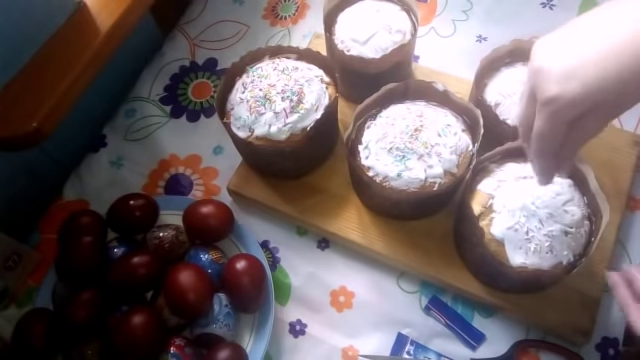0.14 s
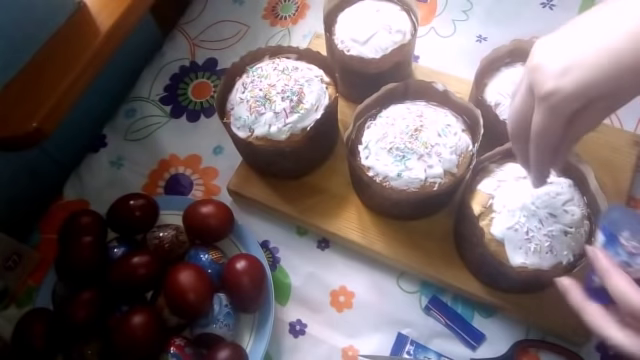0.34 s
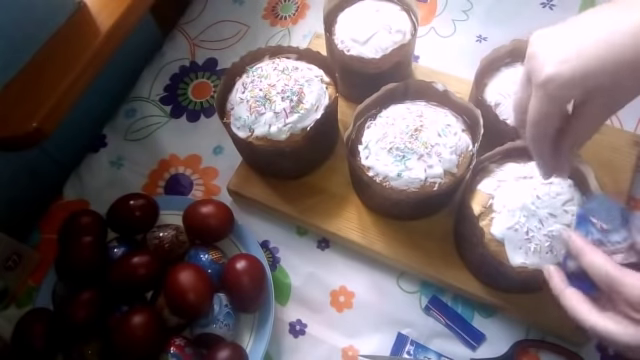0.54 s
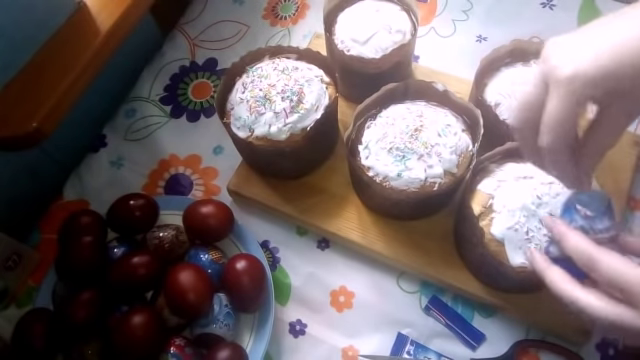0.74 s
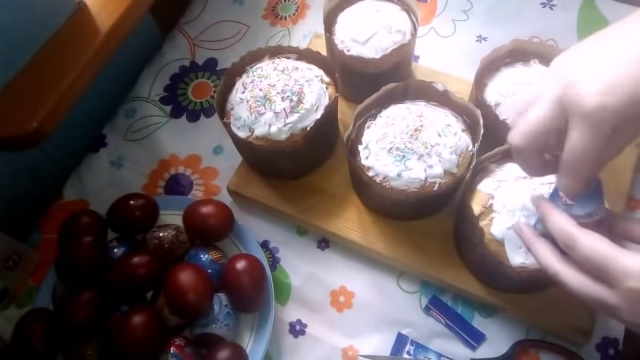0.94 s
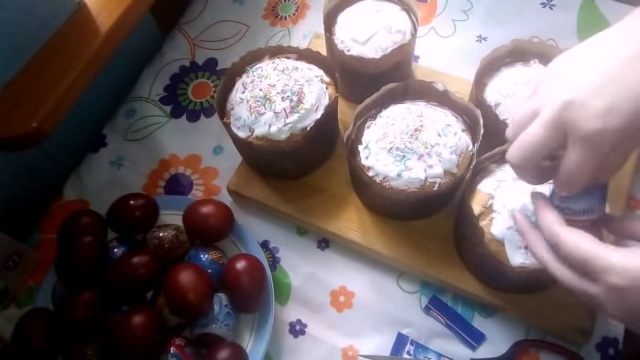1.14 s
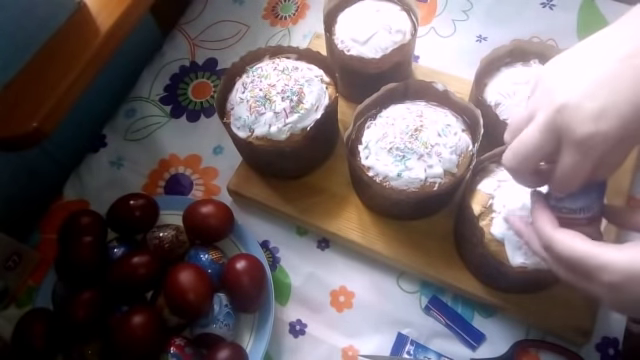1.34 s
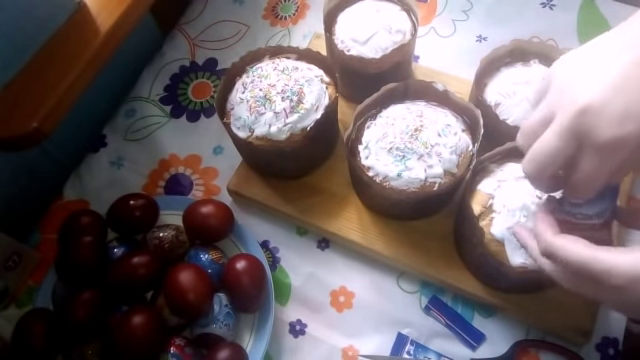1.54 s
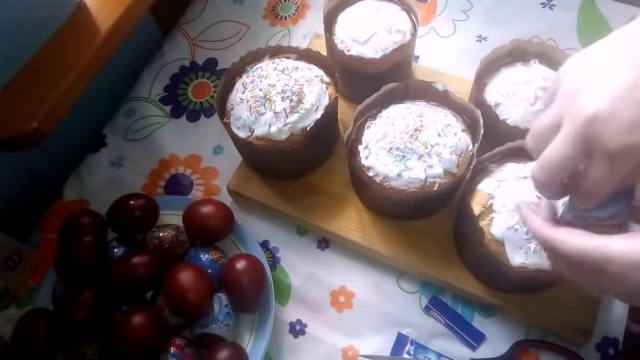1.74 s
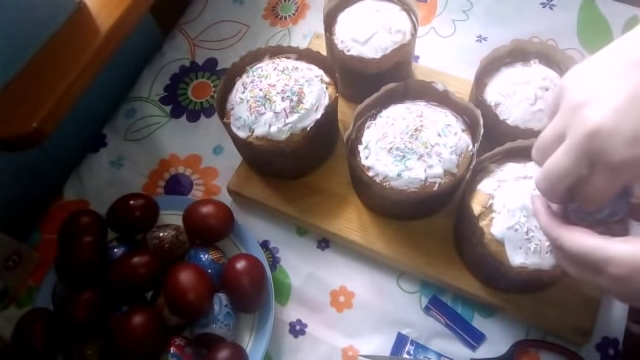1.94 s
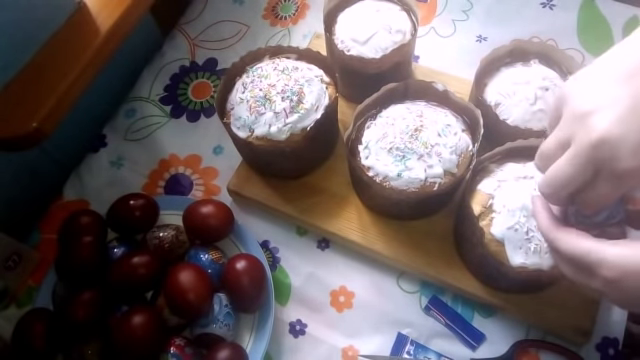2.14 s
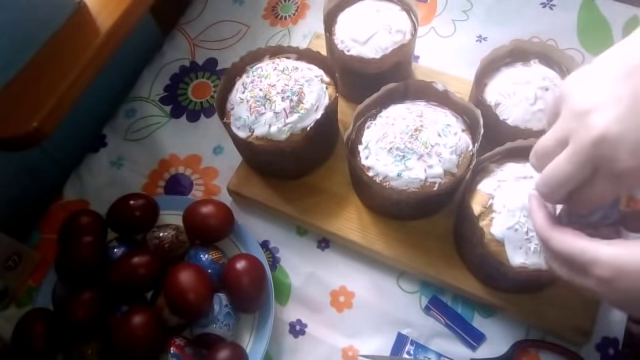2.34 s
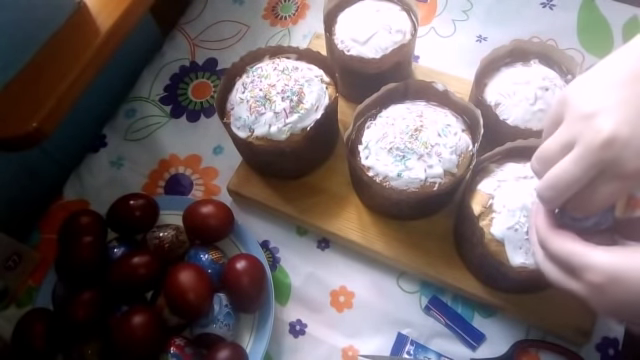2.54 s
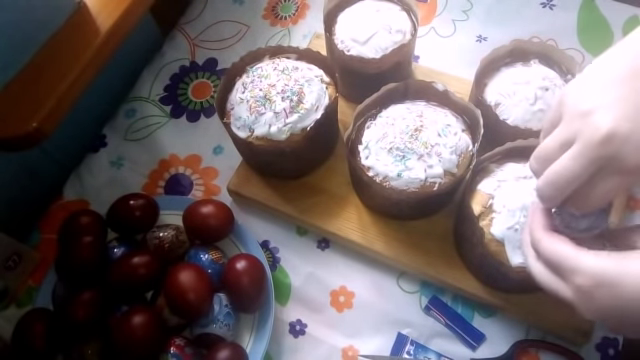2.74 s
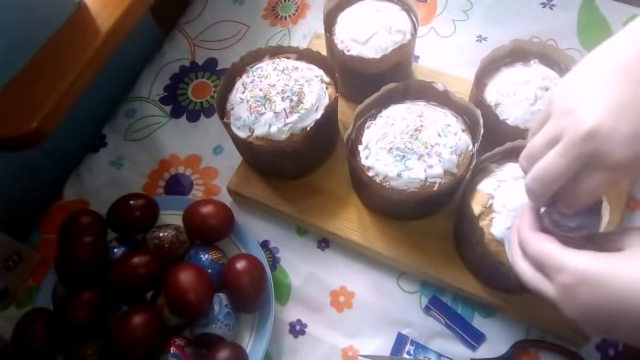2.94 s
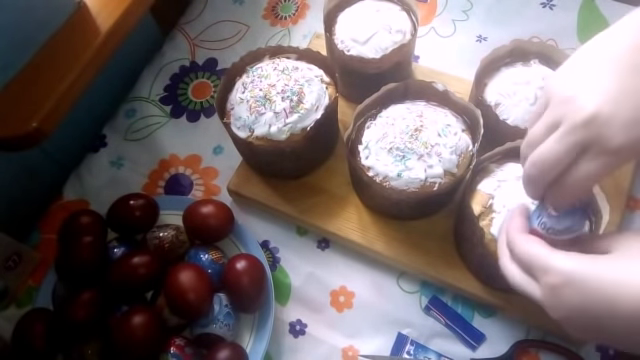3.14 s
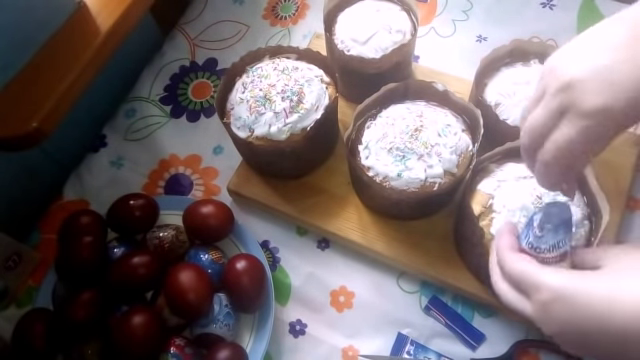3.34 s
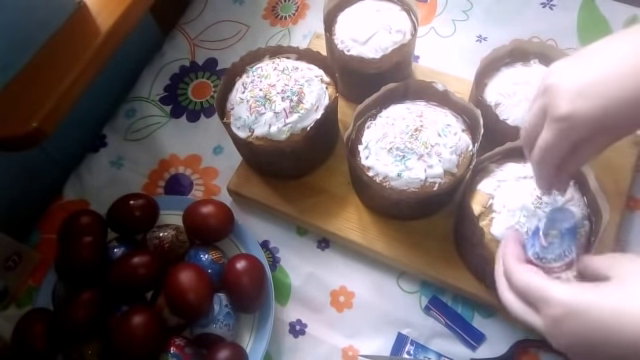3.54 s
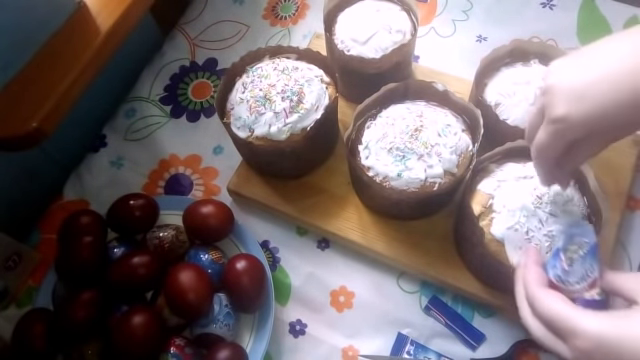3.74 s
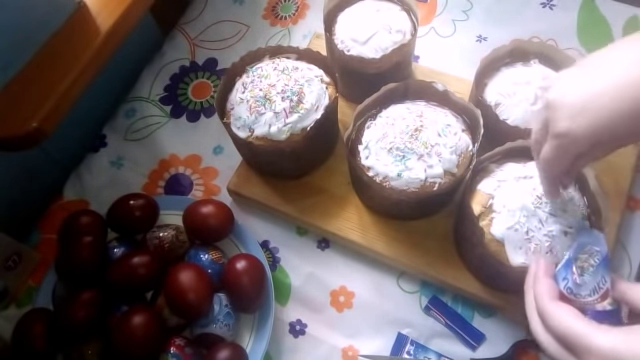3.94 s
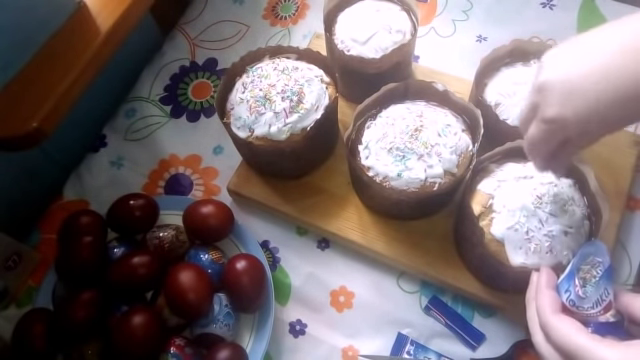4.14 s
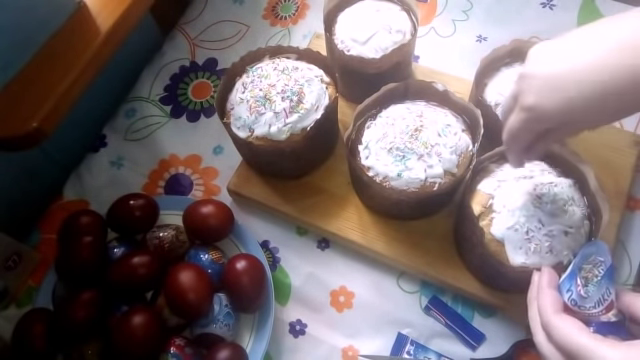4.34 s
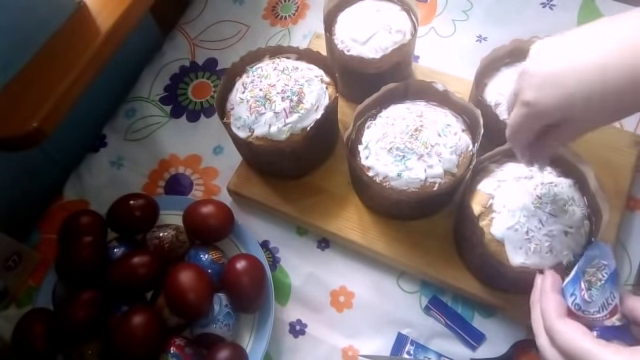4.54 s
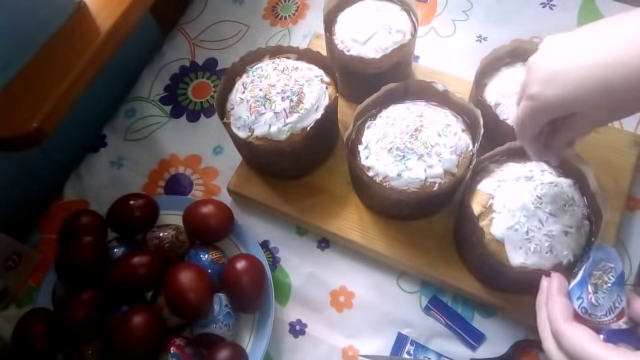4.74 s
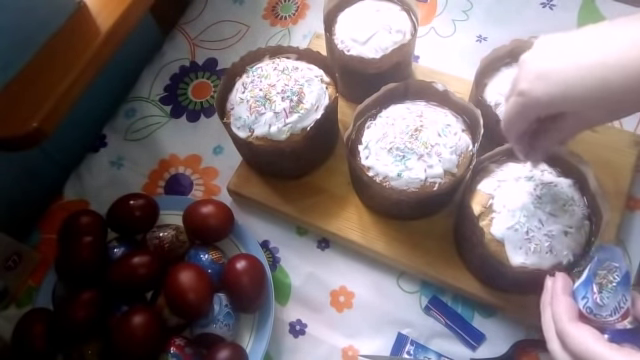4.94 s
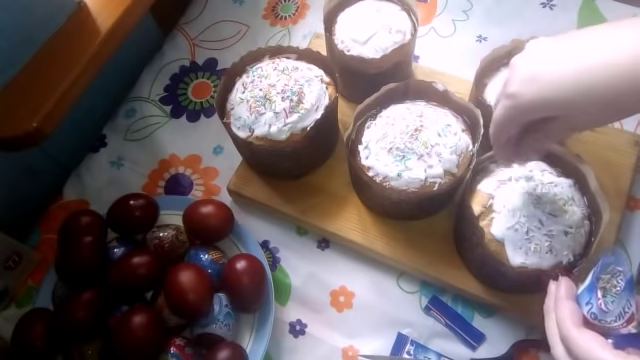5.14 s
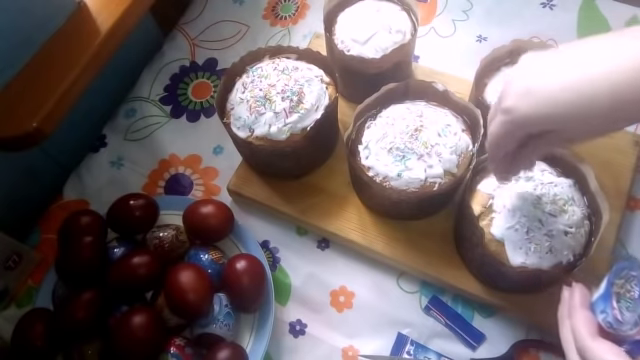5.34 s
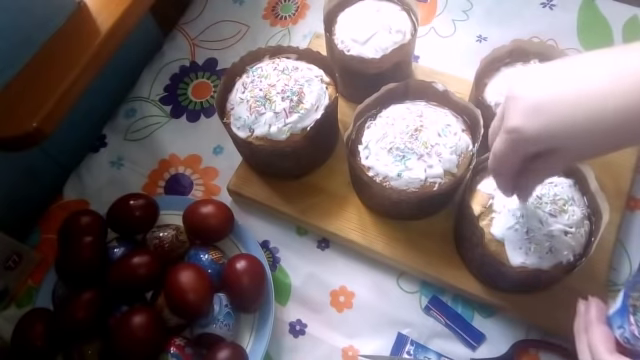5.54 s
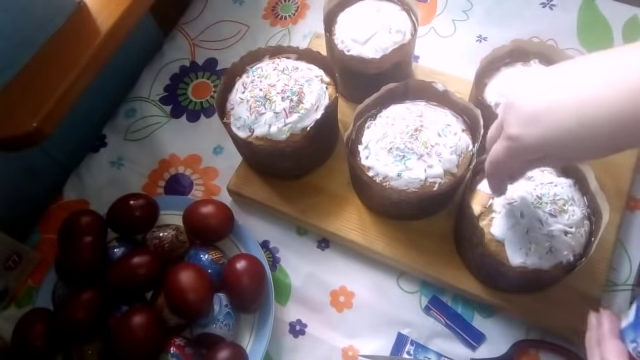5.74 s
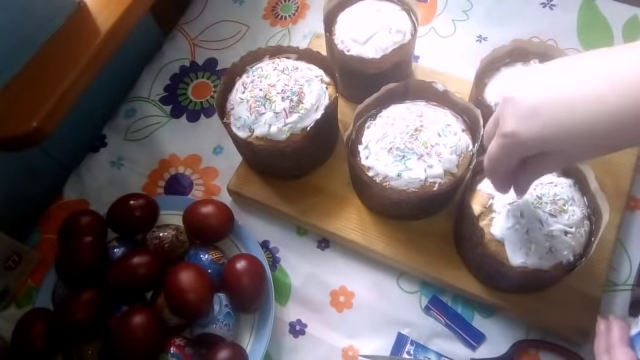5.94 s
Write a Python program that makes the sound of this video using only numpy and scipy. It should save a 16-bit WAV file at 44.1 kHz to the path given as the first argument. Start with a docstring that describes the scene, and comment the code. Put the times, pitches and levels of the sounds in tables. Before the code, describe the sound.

A small, thin plastic packet is handled close to a stereo microphone, slightly to the right, in a quiet kitchen with a short, soft reverberation. A faint wavering appliance hum, low rumble and gentle room noise run throughout. At first it is nearly still, with a clear tick at 0.4 s. From 0.8 s the film crinkles, bursting into dense, bright, crisp crackles at 0.9-1.1 s, with lighter ones to 1.3 s. Strong separate snaps come at about 1.6, 1.75, 1.85 and 1.95 s, then a fuller, grainy crumple with fine rustle at 2.05-2.2 s. Small ticks follow until two hard snaps at 2.85-2.9 s. After that the handling is lighter: scattered soft crinkles at 3.2-3.9 s, a few at 4.2-4.7 s, a lull, a tiny pair at 5.1 s, and a loose cluster of dry little clicks from 5.3 to 5.55 s before settling into room tone.

```python
"""The main source is a small plastic packet, from which fingers dig sugar sprinkles to scatter over cakes.
Each snap is a crease giving way: a burst of slips excites broad, damped resonances of the film.
A finer rustle of random tiny slips lies beneath; both sound to the right of a two-port microphone.
Table and cakes add early echoes, and the walls of a quiet kitchen a short decaying tail.
Behind it an appliance hums in three wavering partials over low room modes and shaped room noise."""
import sys
import numpy as np
from scipy import signal
from scipy.io import wavfile
from scipy.ndimage import uniform_filter1d

SR = 44100
rng = np.random.default_rng(int(sys.argv[2]) if len(sys.argv) > 2 else 0)


def wrap_up_sound(samples):
    """Save the sound to the file named by the first command line argument, as 16-bit audio."""
    columns = np.atleast_2d(samples).T
    # keep every value between -1 and 1, then stretch to whole-number steps
    tamed = np.clip(columns, -1, 1)
    steps = np.round(tamed * 32767).astype(np.int16)
    wavfile.write(sys.argv[1], SR, steps)


def amplitude_ratio(level_db):
    """Convert a level in decibels to the matching linear amplitude (field) ratio."""
    exponent = np.asarray(level_db, float) / 20
    return 10 ** exponent


N = 263277  # samples

# Creases giving way: [t/s, relative level/dB, crease f/Hz, panel f/Hz,
# then against the crease: whole-bag level/dB, flat-panel level/dB, sizzle level/dB]
CREASE_SNAPS = [(0.2065, -45, 6080, 2160, -36, -25, -20), (0.3118, -48, 5430, 2200, -41, -18, -20),
                (0.4225, -18.5, 4970, 2020, -15, 8, -7), (0.497, -42, 6160, 2060, -23, -21, -34),
                (0.5473, -38.5, 5950, 2210, -37, -28, -35), (0.7946, -28.5, 3520, 1800, -4.5, 4, -8.5),
                (0.9235, -29.5, 6330, 1870, -12, 4.5, 4), (0.9275, -24, 6350, 1780, -11, 5, -14),
                (0.9305, -21.5, 3980, 1820, -3, -14, -16), (0.9471, -18, 4500, 1000, -9, 4, -1),
                (0.952, -23.5, 6040, 1840, -27, 9, -2), (0.9891, -8, 6350, 2900, 1.5, -4, -7),
                (1.0197, -11.5, 6440, 2610, -3, 0.5, 7), (1.024, -13.5, 3900, 1520, -14, -6.5, 1),
                (1.034, -16, 4520, 1490, 0, -14.5, -2.5), (1.0513, -24, 6450, 1040, -1.5, -18, -4.5),
                (1.095, -28, 5500, 2000, 0.5, 0, -14), (1.1553, -22, 3200, 1900, -9.5, 10, 0),
                (1.183, -29.5, 4500, 2810, 5.5, -1, 2), (1.222, -36.5, 6000, 2500, -3, -3, 4),
                (1.2873, -27, 5830, 2740, -4.5, 0.5, 5), (1.3156, -15.5, 3700, 1760, 4, 1, -1),
                (1.4261, -32.5, 4200, 1950, -17, 3.5, 5), (1.447, -36, 5500, 2500, -37, -14, -11),
                (1.478, -33, 5970, 2500, -25, -17, -21), (1.4917, -26.5, 5660, 2790, -17, -20, -36),
                (1.507, -41, 5900, 2500, -28, -13, -25), (1.6246, -16, 5000, 1590, -11, -3, -20),
                (1.637, -19.5, 5540, 1780, -6, -11.5, -7), (1.7412, -7.5, 5400, 2100, -8.5, 1, -8),
                (1.8476, -10, 5530, 2330, -8.5, -0.5, -18), (1.9372, -7.5, 6530, 2240, -17.5, -13.5, -11),
                (2.0649, -20, 5270, 980, 7, -17, 4), (2.0699, -23.5, 4940, 2280, 7, 9, 9.5),
                (2.073, -21, 4940, 2320, -6, 10.5, -5), (2.0915, -16, 6260, 1440, -2, 5, 4.5),
                (2.1457, -37, 5400, 1460, -15, 12, -3), (2.1974, -24, 5840, 2570, -33, -3, -3),
                (2.225, -32, 5000, 2310, -34, 5, -15), (2.2746, -38, 3800, 2440, -44, -17, -17),
                (2.2968, -20.5, 6640, 2220, -32, -27, -11), (2.3619, -27, 3500, 2400, -16, -7, -4.5),
                (2.4115, -29.5, 3860, 2640, -13, -15, -18), (2.46, -34.5, 3300, 2190, -25, 0, 1),
                (2.502, -34, 5400, 2340, -26, -5, -7), (2.5344, -26, 5330, 2230, -14, -22, -15),
                (2.576, -36, 4080, 1840, -23, 7, 1), (2.6827, -28.5, 3960, 2600, -32, -18, -20),
                (2.751, -32, 5500, 2600, -28, -25, -18), (2.8498, -11.5, 4540, 2250, -8.5, -7, 4),
                (2.8894, -7.5, 5840, 1680, 4, 5.5, 6), (2.905, -32, 5500, 1750, -12, 4, -1),
                (2.923, -27.5, 6030, 1720, -15, 10, -9), (3.1925, -21.5, 5400, 2890, -20, -22, -42),
                (3.3261, -31, 5840, 2000, -3, 3, -32), (3.3335, -23, 6200, 1750, -15, 4, -12),
                (3.3798, -31.5, 5580, 1840, -5.5, -0.5, 0), (3.6025, -25, 5300, 1355, -29, -3, -38),
                (3.6106, -21.5, 3900, 1580, -19.5, 4, -13.5), (3.655, -29.5, 5100, 1510, -9, -6, -34),
                (3.7508, -26, 4350, 1600, -10.5, -19, -3.5), (3.7843, -21.5, 4900, 1170, -22, -12.5, -10),
                (3.8183, -28, 5450, 1200, -15, -12, -33), (3.8393, -23.5, 4280, 2360, -17, -16, -38),
                (3.8681, -25.5, 4140, 2480, -4.5, -7, -41), (4.2145, -24.5, 4700, 1350, -17, -8, -20),
                (4.277, -32, 4330, 1110, -20, -4, -13), (4.2813, -17.5, 3760, 2190, -14, -33, -20),
                (4.3215, -27.5, 4100, 1040, -25.5, -8, -36), (4.4985, -25, 4480, 2480, -10.5, -18, -16.5),
                (4.502, -26, 5700, 2400, -31.5, -19, -21), (4.5267, -38, 5000, 2280, -27, -4.5, -27.5),
                (4.637, -26, 3620, 1250, -34.5, -6.5, -21.5), (4.642, -29.5, 5300, 2200, -30, 0.5, -25),
                (4.6668, -30.5, 5050, 1330, -24, -5, -27), (4.7008, -35.5, 3840, 2230, -34.5, -2, -13),
                (5.1169, -28.5, 3780, 1125, -17.5, -16.5, -17.5),
                (5.1228, -26.5, 3840, 2740, -31, -29.5, -28),
                (5.2768, -18.5, 4750, 2290, -28.5, -19, -24.5), (5.2949, -23, 5200, 2620, -31, -11, -5),
                (5.3209, -22, 5540, 2500, -11, -10.5, -25), (5.327, -20, 4700, 2830, -27, -26, -31),
                (5.3498, -24.5, 4680, 1400, -34, -10, -19), (5.3952, -24.5, 4800, 2120, -41, -21, -29),
                (5.4234, -35.5, 5460, 3020, -29, -2, -29), (5.474, -39, 5000, 2490, -30, -22, -36),
                (5.5371, -19.5, 4900, 1220, -34, -22, -33), (5.5412, -22.5, 5070, 1710, -27, -16, -39)]
# Squeezes of the packet: [start t/s, hold t/s, relative rustle level/dB, dull part against it level/dB]
FINGER_SQUEEZES = [(0.812, 0.015, -71, -7), (1.024, 0.009, -47, -4), (1.153, 0.016, -49.5, -4.5),
                   (1.418, 0.0081, -58.5, -7), (1.619, 0.032, -57, -5.5), (1.806, 0.11, -58, -1.5),
                   (2.058, 0.25, -51, -7.5), (2.41, 0.12, -53.5, -5.5), (2.597, 0.13, -64.5, -8.5),
                   (2.777, 0.047, -64, -18.5), (2.845, 0.015, -52, -4), (2.984, 0.037, -71, -15),
                   (3.078, 0.21, -69, -8.5), (3.295, 0.033, -58.5, -2), (3.401, 0.04, -81, -3),
                   (3.782, 0.097, -62.5, -9.5), (4.053, 0.096, -83, 4.5), (4.21, 0.072, -73, 7),
                   (4.342, 0.2, -79.5, 0), (5.322, 0.054, -62, -7), (5.558, 0.017, -69.5, -10.5)]
# Relative spectral density of the fine crackle: [f/Hz, level per Hz/dB]
CRACKLE_SPECTRUM = [(1000, -18.5), (1500, -6), (2200, 3.5), (3200, -6.5), (4500, 4), (6300, 1.5),
                    (8000, -6), (11000, -16), (13000, -34)]
# Early echoes from table and cakes: [nominal delay t/s, level/dB]
TABLE_ECHOES = [(.0009, -13), (.0018, -12), (.0028, -12), (.0040, -13), (.0075, -15), (.012, -16)]
# Shading of the far (left) port: [f/Hz, gain level/dB]
FAR_PORT_SHADOW = [(500, -3), (1300, -2.5), (2400, -3.5), (4400, -14.5), (6000, -14), (8000, 0),
                   (11000, -16), (15000, -9)]
# Further treble gain at the far port as the packet moves sideways: [t/s, level/dB]
SIDEWAYS_SHADE = [(0, -5.5), (1.5, 1.5), (2.5, -5), (3, 0), (4, -9.5), (5.97, -3.5)]
# Slight colour of the direct sound and early echoes at the near (right) port: [f/Hz, gain level/dB]
NEAR_PORT_COLOUR = [(900, -1.5), (1150, -0.5), (1380, -0.5), (1650, 0), (3000, -0.5), (3800, 1.5),
                    (4600, 0)]
# Reverberation time of the walls: [f/Hz, time to decay by 60 dB t/s]
WALL_DECAY = [(400, 0.49), (1000, 0.23), (2500, 0.22), (6000, 0.19), (9000, 0.17), (13000, 0.15)]
# Long waves cancel round the thin film, so less of them reaches the walls: [f/Hz, gain level/dB]
WALL_REACH = [(400, -3), (800, -2), (1200, -1), (1600, -3), (2200, -1.5), (4000, 2), (9000, 1), (14000, 0)]
# Colour of the room sound at the far port: [f/Hz, gain level/dB]
FAR_PORT_ROOM = [(600, -0.5), (1500, 3), (3000, -8), (6000, -8.5), (8500, -3), (12000, -10)]
# Colour of the packet at the microphone: [f/Hz, gain level/dB]
MICROPHONE_COLOUR = [(150, -61), (350, -1), (700, 0), (1000, -0.5), (1280, -0.5), (1700, 4), (2600, 4.5),
                     (3300, 3), (4500, 3), (6300, 6), (7600, -4), (10000, -5.5), (13000, -6.5), (15500, -5),
                     (16300, -12.5), (16700, -58.5)]
# Brief dips of the whole level: [centre t/s, half width t/s, level/dB]
LEVEL_DIPS = [(0.941, 0.0034, -50), (0.9857, 0.0047, -6), (1.311, 0.00092, -24), (1.728, 0.0028, -7)]
# Partials of the hum: [nominal f/Hz, nominal rms level/dB, left minus right level/dB, left phase lead/rad]
HUM_PARTIALS = [(243.8, -85, 3.5, 0.08), (487.7, -80, -1, 1), (731.5, -66, -2, 1.59)]
# Slow change of the hum: [t/s, level/dB]
HUM_CONTOUR = [(0, -4.5), (0.4, -0.5), (1.2, 1), (2.2, 3), (2.7, 0.5), (3.3, -1.5), (4.3, 0), (4.999, -1),
               (5.97, 1)]
# Low room modes: [f/Hz, bandwidth f/Hz, relative level/dB]
ROOM_MODES = [(105.4, 6.1, -0.5), (128.4, 20, 2), (156.8, 9.8, 0), (214.7, 56, -3)]
# Low rumble before its random swelling: [t/s, level/dB]
RUMBLE_CONTOUR = [(0.0, -80), (0.01, -75), (1.41, -66.5), (1.46, -63.5), (1.6, -72), (1.63, -61.5),
                  (1.75, -72), (1.81, -61), (2.03, -75), (2.08, -66.5), (2.79, -71.5), (3.08, -68),
                  (3.13, -69), (3.41, -64.5), (3.521, -70), (5.7, -77), (5.79, -65.5), (5.97, -71)]
# Relative spectral density of the room noise: [f/Hz, level per Hz/dB]
AIR_SPECTRUM = [(25, -30), (60, -9), (150, -10.5), (300, -11), (600, -12), (800, -15), (1090, -21.5),
                (1620, -21.5), (4030, -26), (5770, -24.5), (7330, -38.5), (8170, -43), (10100, -46),
                (14000, -50)]
# Correlation of the room noise between the ports: [f/Hz, likeness]
AIR_LIKENESS = [(60, 0.015), (300, 0.0027), (700, 0.42), (1500, 0)]
# Balance of the room noise: [f/Hz, left minus right level/dB]
AIR_BALANCE = [(60, 3), (240, -2), (950, 0.5), (3770, -1.5), (15000, 6)]

LEAD_S = 0.002  # time from the first slips to the crack


def snap(db, crease_hz, panel_hz, bag_db, panel_db, sizzle_db, chance):
    """Impulsive excitation of damped resonators: one crack with smaller slips drives the film."""
    t = np.arange(len(chance)) / SR
    crack = round(LEAD_S * SR)
    from_crack = t - t[crack]

    # Weaker creases tear more raggedly: their slips die away more slowly.
    slip_decay_s = 0.0014 * amplitude_ratio(-0.2 * (db - 2.5))
    decay_s = np.where(from_crack < 0, LEAD_S / 5, slip_decay_s)
    slips = amplitude_ratio(-24.5) * chance ** 3 * np.exp(-abs(from_crack) / decay_s)
    slips[crack] = 1
    push = slips * np.exp(-abs(from_crack) / 0.0025)  # heavier panels follow only the hard crack

    bag = amplitude_ratio(bag_db) * hump(942, 0.82)
    panel = amplitude_ratio(panel_db) * hump(panel_hz, 0.8)
    panel_ring = amplitude_ratio(panel_db - 12) * hump(panel_hz, 0.15)
    low = causal(bag + panel + panel_ring)
    crease = 0.27 * hump(crease_hz, 0.19) + 0.58 * hump(crease_hz, 0.79)
    high = causal(crease + amplitude_ratio(sizzle_db) * hump(8500, 1.0))

    bright = np.convolve(slips / np.linalg.norm(slips), high)
    heavy = np.convolve(push / np.linalg.norm(push), low)
    return amplitude_ratio(db) * (bright + heavy)


def snaps():
    """Superposition of snaps, dealt in turn to several places, each of which gets its own echoes."""
    places, travel_s = 5, 0.001  # travel from packet to microphone
    out = np.zeros((places, N + 2048))
    chance = rng.standard_normal((len(CREASE_SNAPS), 700))
    for k, (start_s, *shape) in enumerate(CREASE_SNAPS):
        sound = snap(*shape, chance[k])
        first = round((start_s + travel_s - LEAD_S) * SR)
        out[k % places, first:first + len(sound)] += sound
    return out[:, :N]


def grip():
    """Power addition of exponential envelopes: squeezes build fast, hold and relax slower."""
    build_db_per_s, relax_db_per_s, resting_db = 249, 151, -85.5
    t = np.arange(N) / SR
    power = np.full((2, N), amplitude_ratio(2 * resting_db))  # rows: bright, dull
    for start, hold, db, dull_db in FINGER_SQUEEZES:
        before = build_db_per_s * np.maximum(start - t, 0)
        after = relax_db_per_s * np.maximum(t - start - hold, 0)
        power += amplitude_ratio(2 * (db - before - after)) * amplitude_ratio(2 * np.array([[0], [dull_db]]))
    return np.sqrt(power)


def rustle():
    """Shot noise: dense random slips of film and sugar beads, lightly clumped, excite short resonances."""
    median_grains_per_s, pops_per_s, pops_db = 4500, 160, -4
    rate = median_grains_per_s * amplitude_ratio(5 * slow(40))
    size = amplitude_ratio(3.6 * np.minimum(rng.exponential(1, N), 4))
    grains = size * (rng.random(N) < rate / SR) * rng.choice([-1, 1], N)

    kind = rng.integers(0, 16, N)  # chooses the pitch of each slip
    bright, dull = np.zeros(N), np.zeros(N)
    for k, hz in enumerate(np.geomspace(1000, 13000, num=16)):
        grain = causal(hump(hz, 0.28)) * amplitude_ratio(read(CRACKLE_SPECTRUM, hz)) * np.sqrt(hz)
        part = dull if hz < 3000 else bright
        part += signal.oaconvolve(grains * (kind == k), grain)[:N]

    # Small creases pop within the rustle, and each pop also shakes a panel.
    ticks = amplitude_ratio(2.0 * np.minimum(rng.exponential(1, N), 3)) * (rng.random(N) < pops_per_s / SR)
    pops, thuds = np.zeros(N), np.zeros(N)
    for k, hz in enumerate(np.geomspace(2800, 7000, num=8)):
        pops += signal.oaconvolve(ticks * (kind % 8 == k), causal(hump(hz, 0.6)))[:N]
    for k, hz in enumerate(np.geomspace(1900, 2900, num=4)):
        thuds += signal.oaconvolve(ticks * (kind % 4 == k), causal(hump(hz, 0.2)))[:N]

    bright = evened(evened(bright) + amplitude_ratio(pops_db) * evened(pops))
    dull = evened(evened(dull) + amplitude_ratio(pops_db) * evened(thuds))
    return amplitude_ratio(2.4 * slow(25)) * (grip() * [bright, dull]).sum(axis=0)


def ports(x):
    """Arrival-time delay and shading: the left port hears later; echoes reach the two samples apart."""
    taps = np.zeros((2, 800))
    taps[:, 0] = 1  # direct sound
    for delay_s, db in TABLE_ECHOES:
        at = round(delay_s * rng.uniform(0.85, 1.15) * SR) + rng.integers(0, 6, 2)
        taps[[0, 1], at] = amplitude_ratio(db) * rng.choice([-1, 1])
    far, near = signal.oaconvolve(x[None], taps, axes=1)[:, :N]

    lag_s = 0.00017
    late = np.r_[np.zeros(round(lag_s * SR)), colour(FAR_PORT_SHADOW)]
    aside = amplitude_ratio(np.interp(np.arange(N) / SR, *np.transpose(SIDEWAYS_SHADE)))
    bass = signal.lfilter(*signal.butter(1, 1500, fs=SR), far)  # long waves bend round the housing
    left = signal.oaconvolve(bass + aside * (far - bass), late)[:N]
    right = signal.oaconvolve(near, colour(NEAR_PORT_COLOUR))[:N]
    return np.array([left, right])


def walls(x):
    """Statistical reverberation: sparse random reflections decay exponentially, each band at its own rate."""
    taps = np.zeros((2, SR // 2))
    at = np.arange(176, SR // 2 - 16, 16)
    places = at + rng.integers(0, 16, (2, len(at)))
    np.put_along_axis(taps, places, rng.choice([-1., 1.], (2, len(at))), 1)

    hz, t, z = signal.stft(taps, SR, nperseg=128)
    decay = amplitude_ratio(-60 * t / read(WALL_DECAY, hz)[:, None])
    onset = np.minimum(t / 0.0024, 1)
    tail = signal.istft(z * decay * onset, SR, nperseg=128)[1]
    tail *= 1 / np.linalg.norm(tail[1])
    tail = signal.oaconvolve(tail, colour(WALL_REACH)[None], axes=1)
    tail[0] = np.convolve(tail[0], colour(FAR_PORT_ROOM))[:tail.shape[1]]
    return signal.oaconvolve(x[None], tail, axes=1)[:, :N]


def hum():
    """Additive synthesis: motor partials share one wavering pitch and differ in phase between ports."""
    t = np.arange(N) / SR
    warped_s = np.cumsum(1 + 0.0006 * slow(3)) / SR  # time axis whose speed wavers
    contour_db = np.interp(t, *np.transpose(HUM_CONTOUR))
    out = np.zeros((2, N))
    for hz, db, pan_db, lead in HUM_PARTIALS:
        balance_db = np.array([[pan_db / 2], [-pan_db / 2]])
        peak = np.sqrt(2) * amplitude_ratio(db + contour_db + 2.4 * slow(6.6) + balance_db)
        out += peak * np.sin(2 * np.pi * hz * warped_s + np.array([[lead], [0]]))
    return out


def rumble():
    """Modal resonance: noise, partly shared by the ports, excites the low room modes and swells softly."""
    noise = rng.standard_normal((3, N))
    noise = noise[:2] + 0.66 * noise[2]
    modes = np.zeros((2, N))
    for hz, width, db in ROOM_MODES:
        modes += amplitude_ratio(db) * evened(signal.lfilter(*signal.iirpeak(hz, hz / width, SR), noise))
    level_db = np.interp(np.arange(N) / SR, *np.transpose(RUMBLE_CONTOUR))
    return evened(modes) * amplitude_ratio(level_db + 2.5 * slow(8))


def air():
    """Partially coherent noise: random spectra with gentle patches in time and frequency."""
    frames, hz = N // 512 + 5, np.fft.rfftfreq(2048, 1 / SR)
    a, b, c, d, patches = rng.standard_normal((frames, 1025, 5)).T
    patches = uniform_filter1d(uniform_filter1d(patches, 8, 0), 12, 1)
    patches_db = 2.2 * evened(patches)

    same = np.clip(read(AIR_LIKENESS, hz), -1, 1)[:, None]
    left = a + 1j * b
    right = same * left + np.sqrt(1 - same ** 2) * (c + 1j * d)
    z = np.array([left, right]) * amplitude_ratio(read(AIR_SPECTRUM, hz)[:, None] + patches_db)
    z[0] *= amplitude_ratio(read(AIR_BALANCE, hz))[:, None]
    noise = signal.istft(z, nperseg=2048, noverlap=1536)[1][:, :N]
    return amplitude_ratio(-68.5) * evened(noise)  # rms level/dB


def evened(x):
    """Normalisation of mean power: scales to rms 1."""
    return x / np.sqrt(np.mean(x ** 2) + 1e-20)


def read(points, hz):
    """Logarithmic frequency scale: joins (f/Hz, value) points along it."""
    f, value = np.transpose(points)
    return np.interp(np.log(hz + 1), np.log(f + 1), value)


def hump(hz, octaves):
    """Damped resonance: a broad peak in log frequency, of energy 1, on the full circle of bins."""
    f = abs(np.fft.fftfreq(2048, 1 / SR)) + 1
    return evened(np.exp(-(np.log2(f / hz) / octaves) ** 2))


def causal(gain):
    """Minimum phase: the Hilbert transform of log gain on 2048 bins gives a response with no pre-echo."""
    log_gain = np.log(gain + 1e-4)
    phase = -signal.hilbert(log_gain).imag
    return np.fft.ifft(np.exp(log_gain + 1j * phase)).real[:600]


def colour(points):
    """Linear filtering: a causal response with the given (f/Hz, level/dB) spectrum."""
    return causal(amplitude_ratio(read(points, abs(np.fft.fftfreq(2048, 1 / SR)))))


def slow(rate):
    """Superposed slow sines: a random wander of rms 1 over the three octaves below rate (f/Hz)."""
    t = np.arange(N) / SR
    wander = np.zeros(N)
    for f in np.geomspace(rate / 8, rate, num=16):
        wander += np.sin(2 * np.pi * (f * t + rng.random())) / np.sqrt(f)
    return evened(wander)


def dips():
    """Amplitude modulation: the gain sags for milliseconds just ahead of some snaps."""
    t = np.arange(N) / SR
    return amplitude_ratio(sum(db * np.exp(-((t - s) / width) ** 2) for s, width, db in LEVEL_DIPS))


def scene():
    """Superposition: packet direct and off the walls, coloured at the microphone, over the background."""
    fine = rustle()
    packet = np.zeros((2, N))
    for place in snaps():
        packet += ports(place) + amplitude_ratio(-6) * walls(place)
    packet += ports(fine) + amplitude_ratio(-4) * walls(fine)
    packet = signal.oaconvolve(packet, colour(MICROPHONE_COLOUR)[None], axes=1)[:, :N]
    return packet + air() + rumble() + hum()


def band_limit(x):
    """A steep low-pass at the top of the band."""
    return signal.sosfilt(signal.butter(12, 16510, fs=SR, output="sos"), x)


def record(dry):
    """Amplitude modulation of the whole scene: its level dips briefly."""
    mix = dry * dips()
    return band_limit(mix)


dry = scene()
out = record(dry)
wrap_up_sound(out)
```